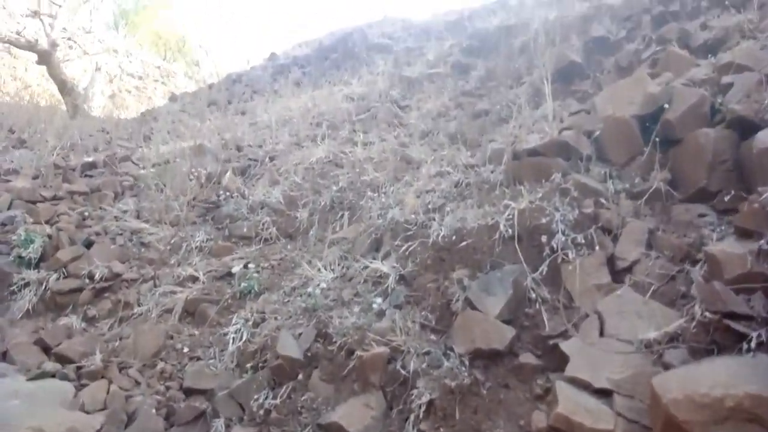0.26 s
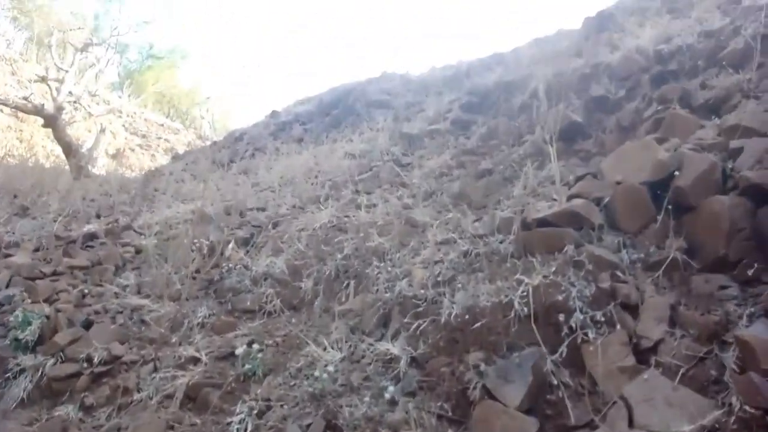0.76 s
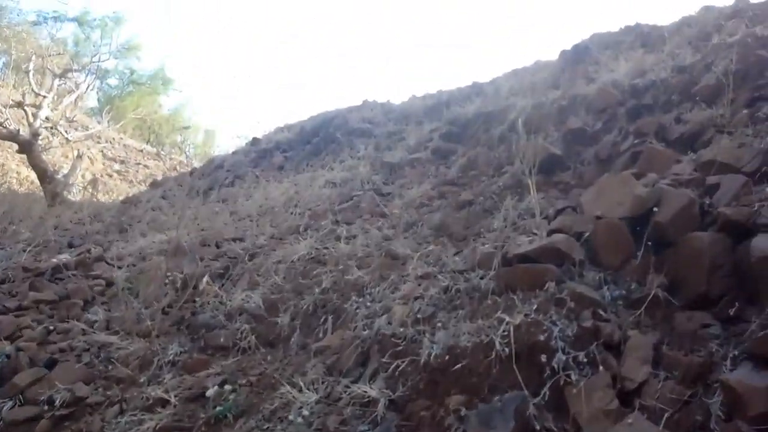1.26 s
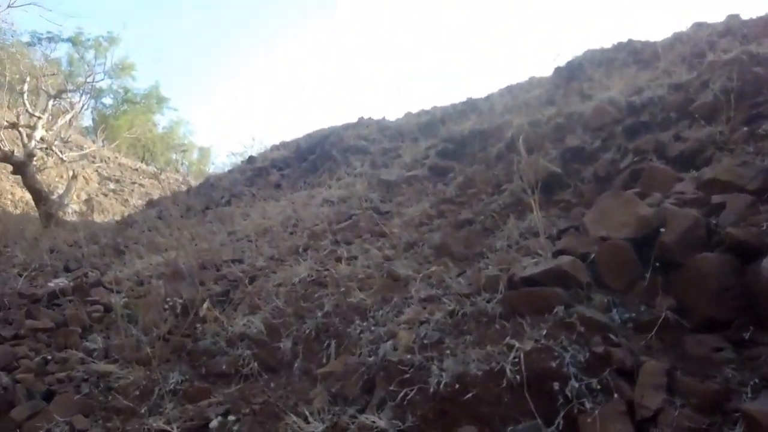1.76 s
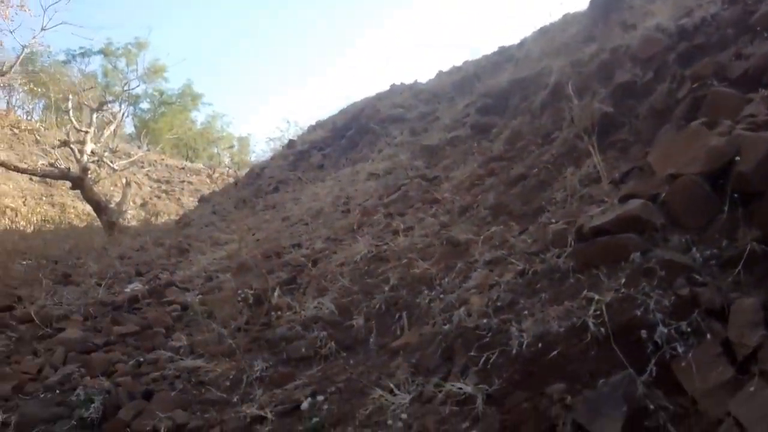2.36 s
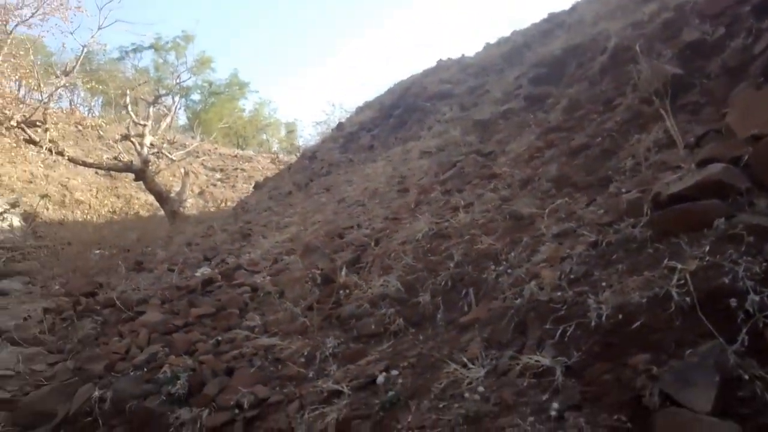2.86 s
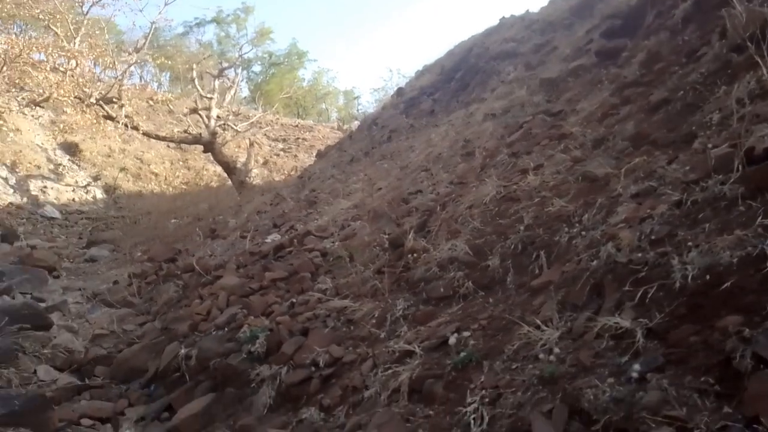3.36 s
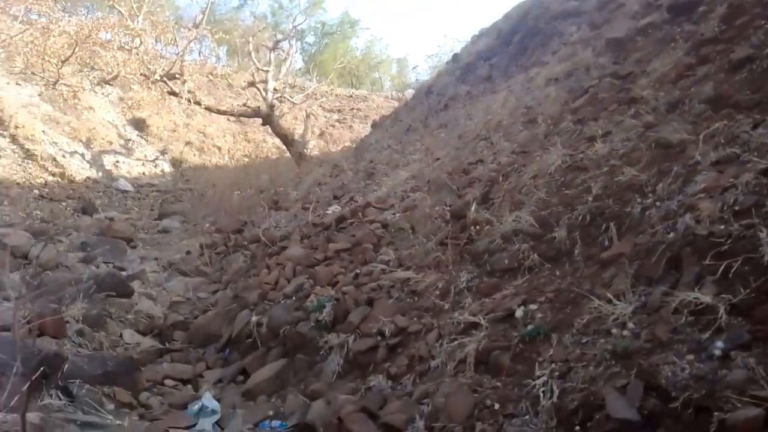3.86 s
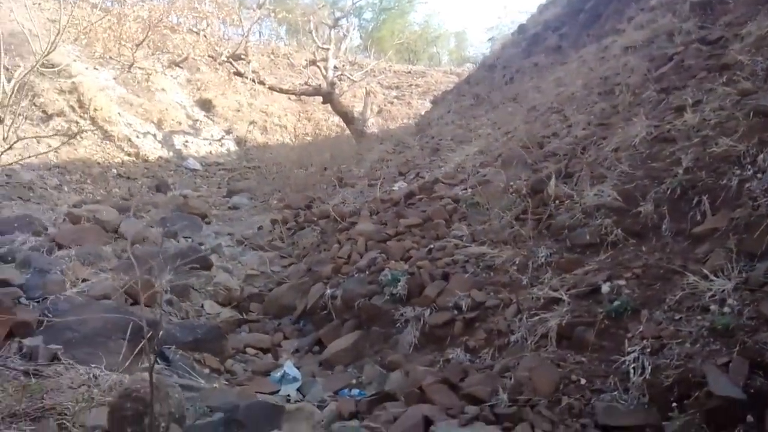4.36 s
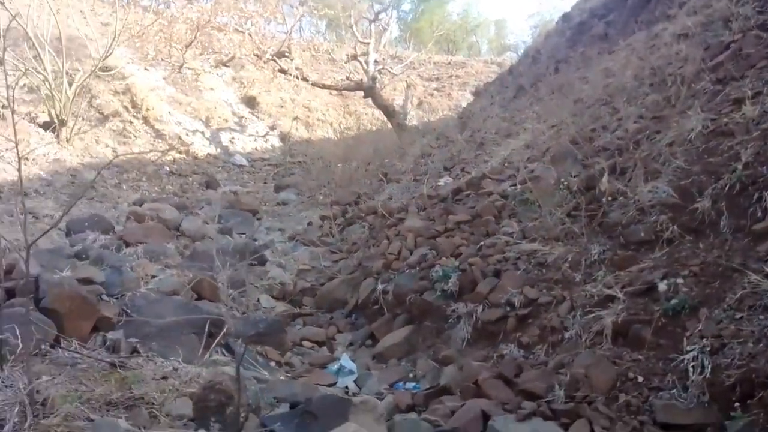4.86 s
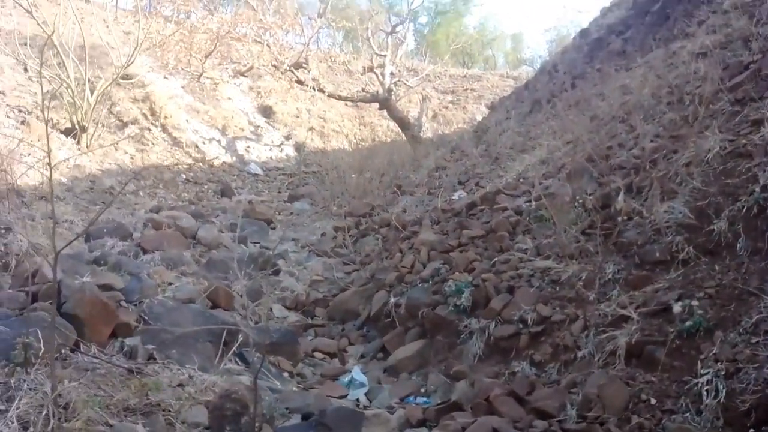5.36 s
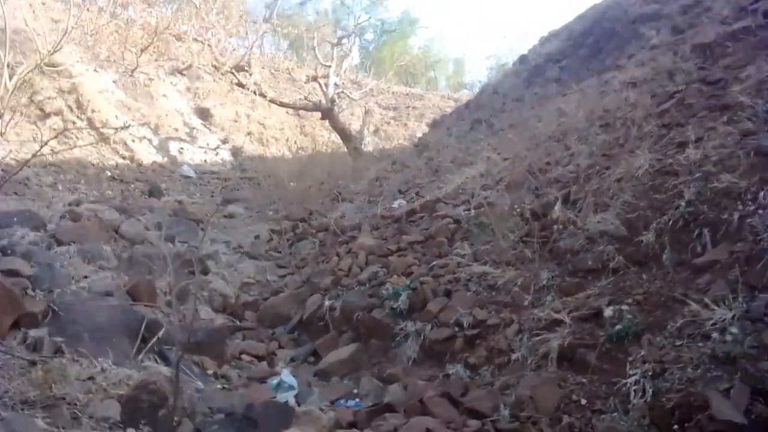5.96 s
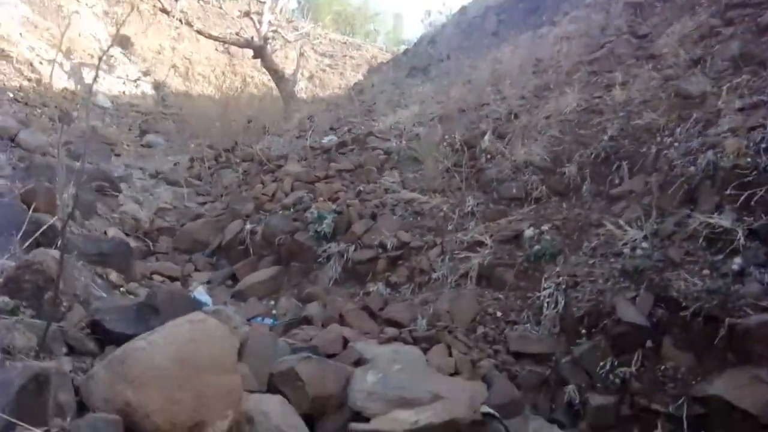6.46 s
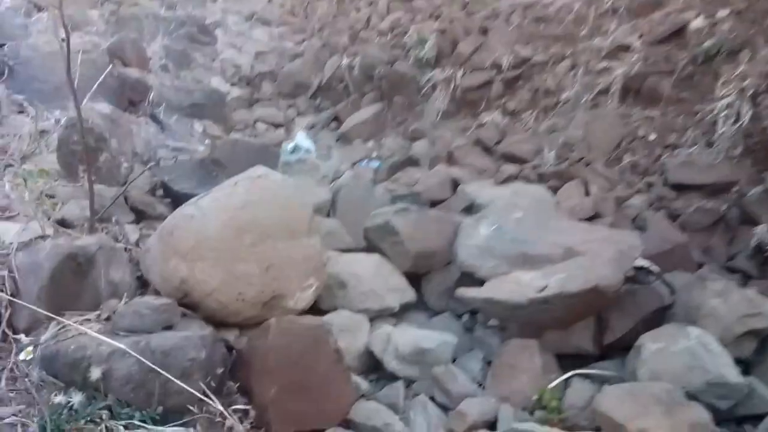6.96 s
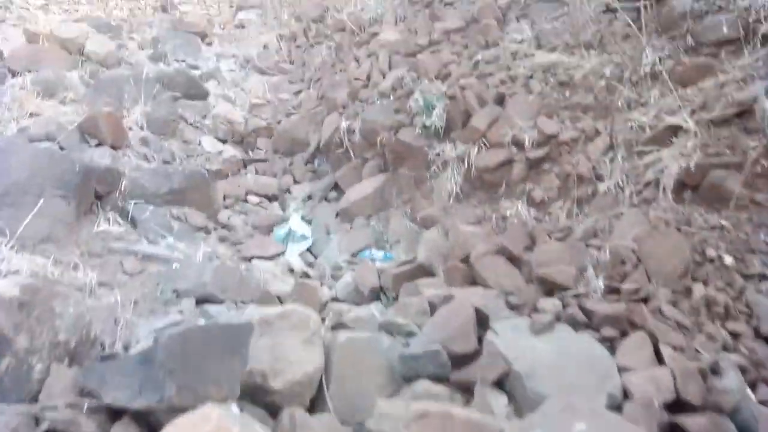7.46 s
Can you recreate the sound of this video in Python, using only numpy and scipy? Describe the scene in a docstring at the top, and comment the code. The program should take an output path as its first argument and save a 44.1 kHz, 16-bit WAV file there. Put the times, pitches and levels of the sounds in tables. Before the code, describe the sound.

Muffled steps on stones under close skin rubbing and sharp case clicks, until a squeak and thump uncover the microphone and the steps sound clear.

```python
"""Someone steps among loose stones in a dry stream bed, holding a small camera in a light wind.
At first a finger covers the microphone port: skin rubs, the gripped case ticks, and grit, grass and
knocking stones come through thinly, with faint birds and one far call. Near 5.9 s the finger drags
off with a stick-slip squeak and a suction pop. Then stones clack and grass crunches openly underfoot,
over the murmur of the valley and a few more bird notes."""
import sys
import numpy as np
from scipy import signal
from scipy.fft import rfft, irfft, next_fast_len
from scipy.io import wavfile
from scipy.ndimage import uniform_filter1d

SR = 44100
rng = np.random.default_rng(int(sys.argv[2]) if len(sys.argv) > 2 else 0)


def wrap_up_sound(samples):
    """Save the sound to the file named by the first command line argument, as 16-bit audio."""
    columns = np.atleast_2d(samples).T
    # keep every value between -1 and 1, then stretch to whole-number steps
    tamed = np.clip(columns, -1, 1)
    steps = np.round(tamed * 32767).astype(np.int16)
    wavfile.write(sys.argv[1], SR, steps)


N = 340319
T = np.arange(N) / SR
SIZE = 8192  # samples in a one-shot's buffer
SHOT_T, HZ = np.arange(SIZE) / SR, np.fft.rfftfreq(SIZE, 1 / SR)
PORT_OPENS_S = 5.89


def amp(db):
    """Decibels to gain."""
    return 10 ** (np.asarray(db) / 20)


def unit(x):
    """Scales to rms 1."""
    return x / np.sqrt(np.mean(x ** 2) + 1e-20)


def eq_at(curve, hz):
    """Reads an EQ curve in dB on a log-frequency axis."""
    f, db = np.transpose(curve)
    return np.interp(np.log(hz + 1), np.log(f), db)


def add(mix, s, sound):
    """Mixes a sound in at time s."""
    part = mix[max(round(s * SR), 0):][:len(sound)]
    part += sound[:len(part)]


def causal(db):
    """Minimum-phase response with this gain: it rings only after the blow."""
    log_gain = np.log(amp(db))
    mirrored = np.concatenate([log_gain, log_gain[-2:0:-1]])
    return np.exp(np.conj(signal.hilbert(mirrored)))[:len(db)]


def coloured(x, curve):
    """Runs a full-length layer through an EQ curve, to rms 1."""
    size = next_fast_len(N, True)
    gain = amp(eq_at(curve, np.fft.rfftfreq(size, 1 / SR)))
    return unit(irfft(rfft(x, size) * gain, size)[:N])


def wander(count, per_s):
    """Smooth random drift of rms 1."""
    knots = rng.standard_normal(4000)
    return unit(np.interp(np.arange(count) / SR * per_s, np.arange(len(knots)), knots))


def grains(count, per_s, spread_db):
    """Sparse tiny slips, mostly small and a few large."""
    size = amp(spread_db * np.minimum(rng.exponential(1, count), 4))
    return unit(size * rng.choice([-1, 1], count) * (rng.random(count) < per_s / SR))


def patchy(x, db, patch_hz=300, patch_s=.035):
    """Shifting contact points favour a few pitches for a moment: random patches in time and frequency."""
    frames = signal.stft(x, nperseg=512, noverlap=384)[2]
    field = rng.standard_normal(frames.shape)
    field = uniform_filter1d(field, max(round(patch_hz * 512 / SR), 1), axis=0)
    field = uniform_filter1d(field, max(round(patch_s * SR / 128), 1), axis=1)
    return unit(signal.istft(frames * amp(db * unit(field)), nperseg=512, noverlap=384)[1][:len(x)])


# Mid, bass, treble and air bands of a one-shot: (low edge [Hz], high edge [Hz])
EQ_BANDS = [(900, 3500), (120, 900), (3500, 7000), (7000, 16000)]
def voiced(spectrum, level_db, *colour_db):
    """EQs a one-shot to a mid level (as rms over 10 ms), with bass, treble and air relative to it."""
    target_db = level_db + np.array([0, *colour_db])
    for _ in range(2):
        power = abs(spectrum) ** 2 * 2 / SIZE / (SR / 100)
        band_db = [10 * np.log10(power[(HZ >= lo) & (HZ < hi)].sum() + 1e-20) for lo, hi in EQ_BANDS]
        mid, bass, treble, air = target_db - band_db
        shelves = [(650, bass), (1150, mid), (2900, mid), (4200, treble), (6300, treble), (8000, air)]
        spectrum = spectrum * causal(eq_at(shelves, HZ))
    return irfft(spectrum)[:SIZE // 2]


# Wind rumble EQ: (frequency [Hz], gain [dB])
WIND_EQ = [(10, 5), (30, -3.5), (60, -1.5), (110, -10), (200, -15.5), (400, -20.5), (900, -27.5),
           (2000, -35), (4000, -39.5), (7000, -56.5), (16000, -63.5)]
def wind(level_db=-58, gust_db=1.23):
    """A light, lumpy rumble of air at the microphone."""
    return coloured(rng.standard_normal(N), WIND_EQ) * amp(level_db + gust_db * wander(N, 14))


def port_open(fade_s=.03):
    """Fade-in for the layers that need the port uncovered."""
    return np.clip((T - PORT_OPENS_S) / fade_s, 0, 1)


# Valley ambience EQ: (frequency [Hz], gain [dB])
VALLEY_EQ = [(100, -24.5), (220, -11.5), (350, 2.5), (520, -12), (900, -14), (1400, -8.5), (2200, -15),
             (5000, -25), (8000, -33), (11000, -40.5), (16000, -42)]
def valley(level_db=-67):
    """The soft murmur of the valley comes in as the port opens."""
    return coloured(rng.standard_normal(N), VALLEY_EQ) * amp(level_db) * port_open()


def high_hiss(level_db=-84):
    """A thin, steady hiss near 15.5 kHz fades in at 6.3 s and eases off at the very end."""
    band = [(10000, -45), (14500, -10), (15500, 0), (15900, -12), (16200, -30)]
    fade = np.interp(T, [6.3, 6.45, 7.5, 7.72], [0, 0.73, 0.87, .3])
    return coloured(rng.standard_normal(N), band) * amp(level_db) * fade


def far_call(level_db=-72, hz=1120):
    """A faint, blurred call from far up the valley: one swell of narrow-band noise."""
    band = [(hz * .3, -60), (hz * .85, -3), (hz, 0), (hz * 1.12, -3), (hz * 1.4, -25), (hz * 4, -70)]
    swell_db = np.interp(T, [1.95, 2.05, 2.17, 2.4, 2.9], [-48, 6, 2.5, -2, -48.5])
    return coloured(rng.standard_normal(N), band) * amp(level_db + swell_db)


def whistle(times, hz, db, waver, flutter_db, fade_s=.015):
    """A near-sine tone that follows a pitch and level curve and wavers a little."""
    t = np.arange(times[0], times[-1], 1 / SR)
    pitch = np.interp(t, times, hz) * (1 + waver * wander(len(t), 700))
    level = amp(np.interp(t, times, db) + flutter_db * wander(len(t), 150))
    fade = np.clip(np.minimum(t - times[0], times[-1] - t) / fade_s, 0, 1)
    return np.sqrt(2) * level * fade * np.sin(2 * np.pi * np.cumsum(pitch) / SR)


# Bird cues: (time [s], length [s], start pitch [Hz], end pitch [Hz], arch [Hz], level [dB])
BIRD_NOTES = [(0, 0.29, 2750, 2745, -6, -74.5), (.47, 0.18, 2730, 2700, -3, -74),
              (0.654, 0.27, 2712, 2680, 3, -74.5), (1.16, 0.12, 6400, 5260, 748, -78),
              (2.11, 0.059, 2440, 2650, 60, -71), (3.42, .1, 6250, 5350, 741, -75),
              (5.57, 0.099, 2820, 2670, -44, -64), (6.289, 0.124, 2765, 2960, 73, -63),
              (6.58, 0.25, 3220, 3190, -1, -74), (6.84, 0.075, 3590, 3430, 24, -65),
              (7.293, 0.027, 2950, 2100, -130, -58.5), (7.328, .028, 2780, 2280, 0, -66)]
def birds(peak_share=0.85, ends_db=-2.5):
    """Small birds on the slopes: each note glides along an arch and is loudest near its end."""
    out, u = np.zeros(N), np.linspace(0, 1, 21)
    swell_db = ends_db * np.interp(u, [0, peak_share, 1], [1, 0, 1]) ** 2
    for s, length, start_hz, end_hz, arch_hz, level in BIRD_NOTES:
        pitch = start_hz + (end_hz - start_hz) * u + arch_hz * np.sin(np.pi * u)
        add(out, s, whistle(s + length * u, pitch, level + swell_db, waver=.007, flutter_db=2.2))
    return out


def bank_echo(hits, echo_db=-36, t60=0.063):
    """The rocky banks scatter back a weak, short tail."""
    tail = rng.standard_normal(SIZE) * amp(-60 * SHOT_T / t60) * (SHOT_T > .002)
    return amp(echo_db) * signal.oaconvolve(hits, tail / np.linalg.norm(tail))[:N]


def swish(peak_s, rise_db_per_s=28.5, fall_db_per_s=25.5):
    """Envelope of a foot swinging through grass: it builds to 1 and dies away."""
    return amp(-np.maximum((peak_s - T) * rise_db_per_s, (T - peak_s) * fall_db_per_s))


# EQs of grass through the finger, and of grass and grit through the open port: (frequency [Hz], gain [dB])
MUFFLED_GRASS_EQ = [(5000, -30), (8200, -6), (9500, -3), (11200, -2), (12300, -24), (16000, -35)]
OPEN_PORT_EQ = [(100, 9), (400, 4.5), (1400, -1.5), (2700, -2.5), (4500, -6), (6000, -13.5), (8000, -6.5),
                (9500, -19.5), (12000, -30.5), (14000, -29), (15600, -25)]
def grass(muffled_db=-84.5, open_db=-57, flutter_db=3.5):
    """Dry grass crackles under two steps: a thin hiss through the finger, then in full."""
    crackle = patchy(grains(N, per_s=7500, spread_db=2.5), db=2.0, patch_s=.02)
    flutter = amp(flutter_db * wander(N, 46))
    muffled_step = coloured(crackle, MUFFLED_GRASS_EQ) * amp(muffled_db) * swish(peak_s=3.87)
    open_step = coloured(crackle, OPEN_PORT_EQ) * amp(open_db) * swish(peak_s=6.922)
    return (muffled_step + open_step * port_open()) * flutter


# EQs of the rub's body, fizz and creaks: (frequency [Hz], gain [dB])
BODY_EQ = [(100, -12), (500, -11.5), (1000, -7.5), (1600, -6.5), (1900, -3), (2250, -1), (2650, -6.5),
           (3200, -16), (4000, -20.5), (5000, -41), (8000, -49)]
FIZZ_EQ = [(2500, -39), (3800, -5), (4500, -16.5), (5000, -5.5), (5500, -3.5), (6200, -13.5), (7200, -28),
           (9000, -32), (11000, -28), (13000, -42), (16000, -47)]
CREAK_EQ = [(1200, -23), (2300, -14), (3400, -9), (5400, 0.5), (6200, -6), (7300, -24.5), (11000, -26.5),
            (14000, -41.5)]
# Fader moves of the rubbing hand: (time [s], body fader [dB], fizz and creak fader [dB])
RUB_FADERS = [(0.0, -71.5, -84.5), (0.71, -73, -87.5), (0.97, -65, -75.5), (1.15, -74.5, -78),
              (1.82, -75.5, -88), (2.24, -66.5, -80.5), (2.55, -64, -71), (2.73, -67.5, -78.5),
              (2.94, -68.5, -76), (3.12, -62.5, -70.5), (3.39, -64.5, -73.5), (3.91, -57, -69),
              (4.15, -63, -74.5), (4.49, -57, -73), (5.02, -64, -78.5), (5.36, -62.5, -72),
              (5.64, -57.5, -74.5), (5.8, -52.5, -64.5)]
def rubbing(body_trim_db=-1, fizz_trim_db=-2, creak_trim_db=-6, flutter_db=1, creak_decay_s=0.0015):
    """Skin creeps over the case in fine slips and larger creaks, coloured by the covered port."""
    times, body_db, fizz_db = np.transpose(RUB_FADERS)
    body_slips = patchy(grains(N, per_s=14000, spread_db=2.5), db=4.0, patch_s=0.041)
    body = coloured(body_slips, BODY_EQ) * amp(body_trim_db + flutter_db * wander(N, 60))
    fizz_slips = patchy(grains(N, per_s=8000, spread_db=3.5), db=1.5, patch_s=.015)
    fizz = coloured(fizz_slips, FIZZ_EQ) * amp(fizz_trim_db + flutter_db * wander(N, 60))
    catches = abs(grains(N, per_s=45, spread_db=6.0))
    bursts = signal.lfilter([1], [1, -np.exp(-1 / (creak_decay_s * SR))], catches)
    friction = patchy(rng.standard_normal(N), db=4.0, patch_hz=700)
    grip_db = np.interp(T, [4.6, 4.9, 5.25, 5.45], [3, 10, 15, 4.5])  # a tighter grip sticks more
    creaks = coloured(bursts * friction, CREAK_EQ) * amp(creak_trim_db + grip_db)
    low = body * amp(np.interp(T, times, body_db))
    high = (fizz + creaks) * amp(np.interp(T, times, fizz_db))
    return (low + high) * np.interp(T, [5.92, 5.97], [1, 0])  # the finger leaves


def faint_scrape_cues(count=56, over_fizz_db=11, spread_db=1.5, length_s=0.0055, treble_db=-8):
    """Small scrapes at chance moments, riding the fizz fader: rows of (time, length, level, treble)."""
    times, _, fizz_db = np.transpose(RUB_FADERS)
    when = (np.arange(count) + rng.random(count)) / count * times[-1]
    size, stretch, colour = rng.standard_normal((count, 3)).T
    level = np.interp(when, times, fizz_db) + over_fizz_db + spread_db * size
    return list(zip(when, length_s * np.exp(stretch / 2), level, treble_db + spread_db * colour))


# EQ of a scrape through the covered port: (frequency [Hz], gain [dB])
COVERED_PORT_EQ = [(100, 7.5), (400, -14), (900, -12), (1500, -17), (2200, -9.5), (2800, -15.5), (3900, -5),
                   (5500, 3.5), (6300, -3), (7400, -28.5), (11000, -21.5), (13000, -35), (16000, -50)]
def add_scrape(mix, s, length, *levels, swell_share=0.4, lead_share=0.14, resonance_db=3.0):
    """Mixes in a swelling clump of slips, coloured by the port and its own broad random resonances."""
    u = SHOT_T / (swell_share * length)
    slips = grains(SIZE, per_s=5000, spread_db=3.5) * u * np.exp(-u)
    port = eq_at(COVERED_PORT_EQ if s < PORT_OPENS_S else OPEN_PORT_EQ, HZ)
    low_cut = eq_at([(40, -28.5), (200, -7.5)], HZ)
    resonances = uniform_filter1d(uniform_filter1d(rng.standard_normal(len(HZ)), size=60), size=60)
    spectrum = rfft(slips) * causal(port + low_cut + resonance_db * unit(resonances))
    add(mix, s - lead_share * length, voiced(spectrum, *levels))


# The louder crunches underfoot: (time [s], length [s], mid level [dB], treble re mid [dB])
GRIT_SCRAPES = [(0.1934, 0.0012, -59.5, -3), (0.421, 0.015, -55.5, -10), (0.72, 0.012, -55.5, -8.5),
                (0.7825, 0.0034, -53.5, -12), (0.8199, 0.0041, -46, -12.5), (0.839, 0.014, -54, -7.5),
                (0.94, 0.0052, -58.5, -4), (1.0095, 0.013, -55.5, -8), (1.059, 0.003, -56, -10),
                (1.091, .007, -60.5, -11), (1.1402, .0035, -58, -15), (1.186, 0.02, -54.5, -12),
                (1.35, 0.053, -71.5, 1), (1.62, .05, -70, 2.5), (2.416, 0.01, -56, -8.5),
                (2.4406, .007, -58.5, -1), (2.465, .004, -58, -2.5), (2.482, .005, -56, -14),
                (2.5404, 0.0074, -45.5, -12.5), (2.5926, 0.0068, -50, -13), (2.769, 0.0028, -59, -12),
                (3.0052, 0.021, -46.5, -8.5), (3.0675, .005, -56.5, -16), (3.175, 0.0032, -50, -11),
                (3.2191, .008, -58, -5), (3.374, .006, -56.5, -7), (3.4607, 0.0046, -57, 4.5),
                (3.641, .007, -54.5, -10), (4.08, .01, -51, -11), (4.2584, .012, -52.5, -7),
                (4.421, .009, -51.5, -9), (4.7264, 0.0029, -50.5, -7), (4.7606, .01, -56.5, -4),
                (5.0162, 0.008, -45, -5.5), (5.201, 0.0031, -59, -9), (5.2838, 0.006, -44, -2),
                (5.558, 0.0032, -48.5, -19), (6.1647, 0.0048, -56, -7), (6.494, .007, -55.5, 0.5),
                (6.536, 0.0035, -56.5, -4), (6.8614, 0.0064, -55.5, -3.5), (6.939, .006, -56, 5.5),
                (6.9524, 0.049, -47.5, -20), (6.9964, 0.0035, -44, -10.5), (7.089, 0.031, -45.5, -10.5)]
def grit():
    """Grit and dry grass scrape, thin while the port is covered and fuller after."""
    out = np.zeros(N)
    for s, length, level, treble in list(GRIT_SCRAPES) + faint_scrape_cues():
        bass_db, air_db = (-13.5, -16.5) if s < PORT_OPENS_S else (-5.5, -2)
        add_scrape(out, s, length, level, bass_db, treble, treble + air_db)
    return out


# Modes of a struck stone on its bed: (frequency [Hz], relative energy [dB], t60 [s])
STONE_RING = [(175, 6.5, 0.014), (351, 6, 0.016), (608, 5, 0.024), (898, -1, 0.022), (1340, 0, 0.0092),
              (1840, -5.5, 0.015), (2560, -12, 0.026), (4000, 4, 0.0035), (5330, 4, 0.0036)]
# Stone hits: (time [s], chatter decay [s], mid level [dB], bass re mid [dB], treble re mid [dB])
STONE_HITS = [(1.9857, 0.0067, -56.5, 5.5, -19), (3.686, 0.0016, -44.5, -2.5, -12.5),
              (3.709, .0008, -45, -5, -23), (3.7158, .0008, -48.5, -3.5, -4),
              (3.733, 0.0045, -49.5, -2.5, -3.5), (3.8027, 0.0021, -40, -3.5, -12),
              (3.959, 0.0015, -37.5, -15, -4.5), (3.963, 0.0021, -44.5, 4, -15),
              (4.4891, 0.0025, -40, -5, -7.5), (4.5383, .003, -52, -4, -28),
              (5.506, 0.0019, -69.5, 21.5, -20), (6.7047, 0.0038, -43.5, 7, -9.5),
              (6.769, 0.0072, -52, 0, -25), (6.8001, 0.0036, -39.5, -2, -24),
              (6.8067, 0.013, -42, 2.5, -16), (6.8276, .0013, -50.5, 6.5, -25),
              (7.121, .0085, -68, 12, -13), (7.134, 0.01, -58.5, 10, -11), (7.198, 0.0054, -71, 22.5, -18),
              (7.215, 0.0052, -71.5, 19.5, -17)]
def stones(chatter_gain=0.92, chatter_per_s=1300, detune_spread=0.052, crack_gain=4, air_db=-11.5):
    """A first contact and a quick chatter crack and briefly ring a stone; each has its own tuning."""
    out, t = np.zeros(N), SHOT_T
    low_cut = causal(eq_at([(40, -14), (170, -6)], HZ))
    for s, decay, level, bass, treble in STONE_HITS:
        touches = rng.random(SIZE) < chatter_per_s / SR
        contacts = chatter_gain * touches * rng.standard_normal(SIZE) * np.exp(-t / decay)
        contacts[0] = 1
        detunes = np.exp(detune_spread * rng.standard_normal(len(STONE_RING)))
        ring = sum(amp(db - 60 * t / t60) / np.sqrt(t60) * np.cos(2 * np.pi * hz * detune * t)
                   for (hz, db, t60), detune in zip(STONE_RING, detunes))
        crack = crack_gain * rng.standard_normal(SIZE) * np.exp(-t / 0.0014)  # crushed grit
        clack = rfft(contacts) * rfft(ring + crack) * low_cut
        add(out, s, voiced(clack, level, bass, treble, treble + air_db))
    return out


# Resonances of the case and port: (frequency [Hz], gain [dB])
CASE_EQ = [(40, -29), (150, -11.5), (330, -7), (600, -7.5), (920, -5), (1300, 7.5), (1850, 11), (2600, 6.5),
           (3500, -6.5), (4200, -21.5), (4700, -17.5), (5600, -15), (7800, -46.5), (10500, -32.5),
           (16000, -56)]
# Case snaps: (time [s], pitch [Hz], mid level [dB], bass re mid [dB], treble re mid [dB])
CASE_SNAPS = [(0.3355, 1860, -27.5, -10, -23), (1.3246, 1860, -26, -7, -22.5),
              (1.4986, 2310, -32.5, -18.5, -3), (1.5385, 1830, -28, -6, -26), (2.5588, 1050, -34, -4, -21),
              (3.8298, 1680, -46, -7.5, -21), (3.9473, 1850, -42.5, -5, -32),
              (4.034, 1720, -38.5, -8.5, -21.5), (5.435, 1520, -47, 9, -29), (5.6209, 1770, -31, -1, -30.5),
              (5.6626, 1500, -44.5, -7.5, -20), (5.784, 2060, -34, -13.5, -5.5),
              (5.8098, 1906, -41, -5.5, -8), (5.826, 2090, -34.5, 0, -4.5), (5.8546, 2264, -28, -6, -8.5),
              (5.8673, 2200, -41.5, -7, -11), (5.8913, 2370, -46.5, 9, 5), (5.9, 1050, -31.5, 5.5, -11.5)]
def case_ticks(case_hz=1840, ring_hz=6000, ring_db=-39, ring_t60=0.032, air_db=-17.5):
    """The case gives under the grip in single dead snaps; a small part inside rings on."""
    out = np.zeros(N)
    ring = rfft(np.sin(2 * np.pi * ring_hz * SHOT_T) * amp(ring_db - 60 * SHOT_T / ring_t60))
    tracking = np.interp(HZ, [1900, 3400], [.85, 0])  # the port's upper resonances stay put
    for s, hz, level, bass, treble in CASE_SNAPS:
        snap = causal(eq_at(CASE_EQ, HZ * (case_hz / hz) ** tracking))
        add(out, s, voiced(snap * (1 + ring), level, bass, treble, treble + air_db))
    return out


# Finger slides: (time [s], length [s], mid level [dB], bass re mid [dB], treble re mid [dB])
FINGER_DRAGS = [(5.376, 0.056, -47.5, -3.5, -18), (5.444, 0.034, -45, 1.5, -15.5),
                (5.837, 0.023, -42.5, -2, -5), (5.87, 0.013, -31, 0, -15.5),
                (5.9046, 0.0031, -29.5, 2, -13), (5.9103, 0.0048, -32.5, 13.5, -6.5),
                (5.928, 0.0035, -50, -11, -2), (5.9396, .003, -46, 0, -8.5), (5.945, .035, -53.5, 1.5, -2),
                (6.002, 0.049, -56, -7, -3)]
def finger_drags(air_db=-12):
    """The finger drags right across the port in short clumps of slips."""
    out = np.zeros(N)
    for s, length, level, bass, treble in FINGER_DRAGS:
        add_scrape(out, s, length, level, bass, treble, treble + air_db)
    return out


# Contour of the squeak: (time [s], pitch [Hz], level [dB])
SQUEAK_CURVE = [(5.735, 1515, -48), (5.76, 1654, -51), (5.785, 1694, -49), (5.808, 1747, -48),
                (5.818, 2467, -49), (5.835, 2660, -39), (5.845, 2510, -37), (5.858, 2610, -44)]
def finger_squeak():
    """Skin sticks and slips on the case in one rising, unsteady squeak."""
    out = np.zeros(N)
    times, hz, db = np.transpose(SQUEAK_CURVE)
    add(out, times[0], whistle(times, hz, db, waver=.025, flutter_db=1.5))
    return out


# Air thumps in the port as the finger leaves: (time [s], level [dB], pitch [Hz], decay [s])
PORT_POPS = [(5.8445, -27, 150, 0.0053), (5.913, -2.5, 81.3, 0.0049), (5.9309, -27.5, 76, 0.0082)]
def port_pops(suction_gain=0.63, build_s=0.0013, release_s=0.00017, lead_s=.01):
    """Suction builds under the lifting finger, lets go, and the pressure swings back and dies."""
    out, t = np.zeros(N), SHOT_T - lead_s
    after = np.maximum(t, 0)
    suction = suction_gain * np.exp(np.minimum(t + 2 * release_s, 0) / build_s)
    released = .5 + .5 * np.tanh(t / release_s)
    for s, db, hz, decay in PORT_POPS:
        swing = np.exp(-after / decay) * np.cos(2 * np.pi * hz * after)
        add(out, s - lead_s, amp(db) * (released * swing - (1 - released) * suction))
    return out


def scene():
    """Mono mix at the microphone; only the hits and scrapes feed the echo."""
    hits = case_ticks() + stones() + grit() + finger_drags()
    mix = hits + bank_echo(hits) + port_pops() + rubbing() + grass() + valley() + high_hiss()
    return (mix + birds() + finger_squeak() + far_call() + wind())[None]


def record(dry, dc_offset=-0.024, cutoff_hz=16400):
    """The camera adds a steady offset and cuts the very top."""
    lowpass = signal.firwin(255, cutoff_hz, window=("kaiser", 9), fs=SR)
    return signal.oaconvolve(dry + dc_offset, lowpass[None], "same")


dry = scene()
out = record(dry)
wrap_up_sound(out)
```